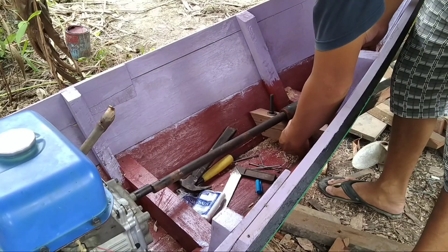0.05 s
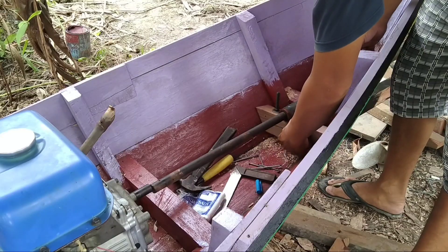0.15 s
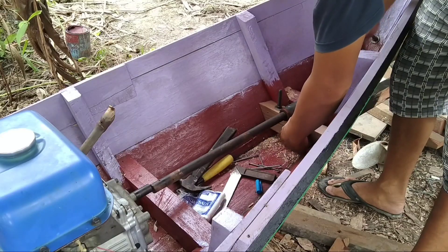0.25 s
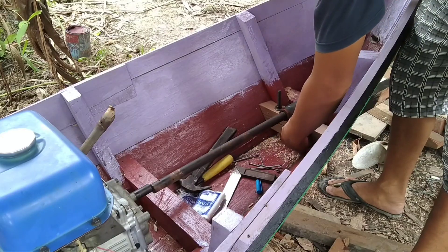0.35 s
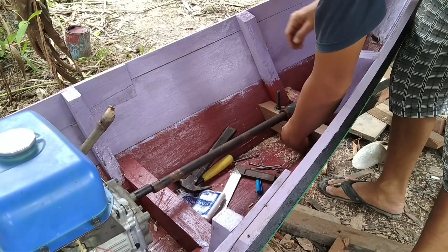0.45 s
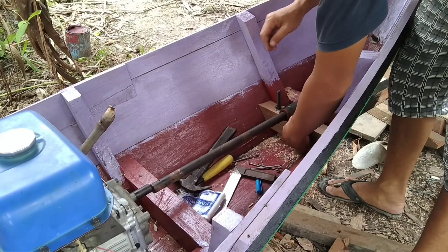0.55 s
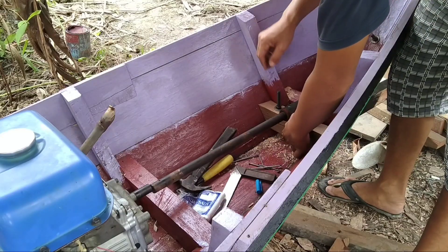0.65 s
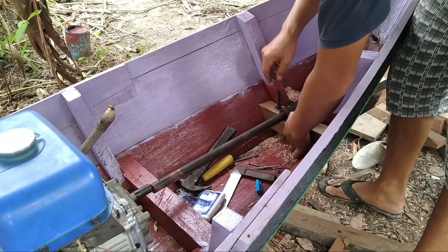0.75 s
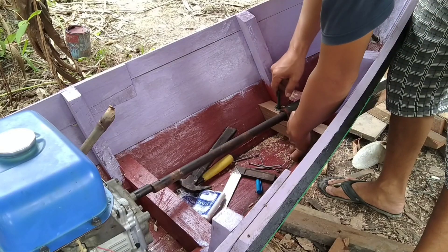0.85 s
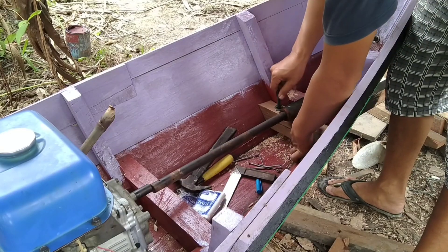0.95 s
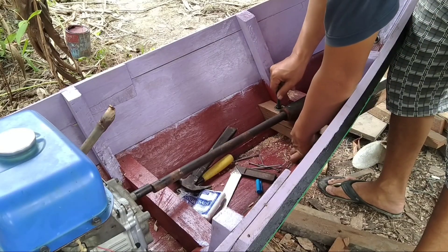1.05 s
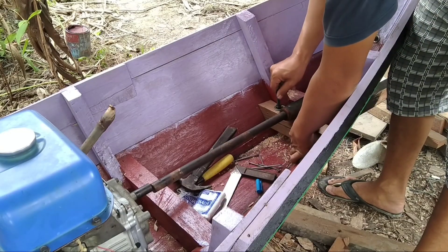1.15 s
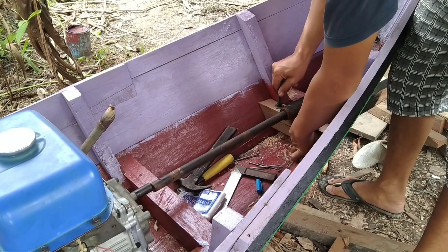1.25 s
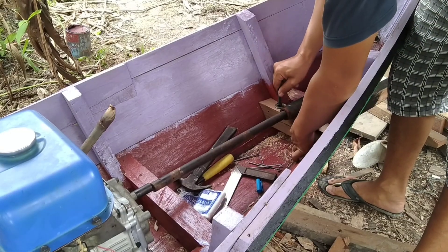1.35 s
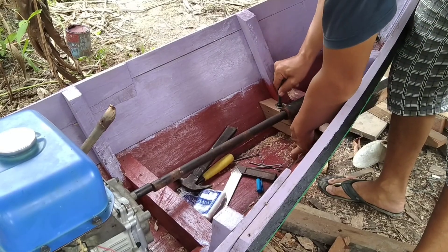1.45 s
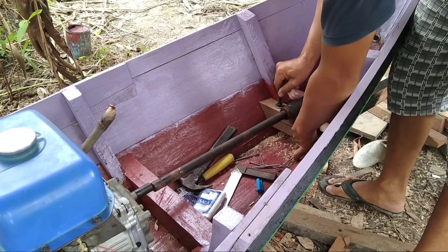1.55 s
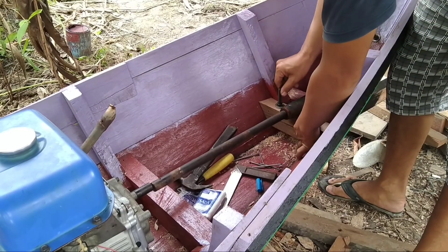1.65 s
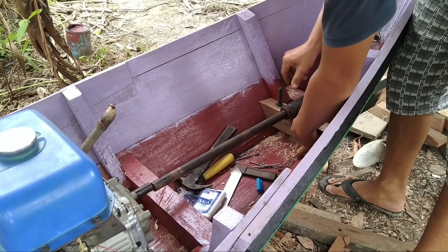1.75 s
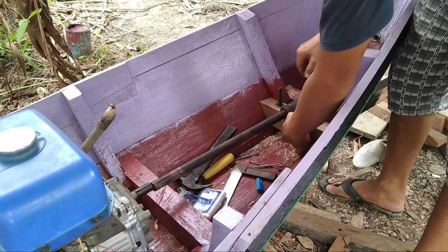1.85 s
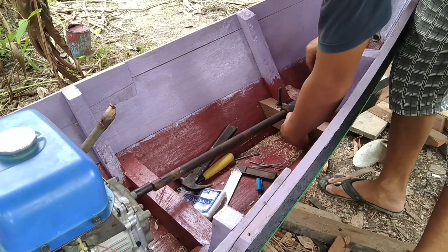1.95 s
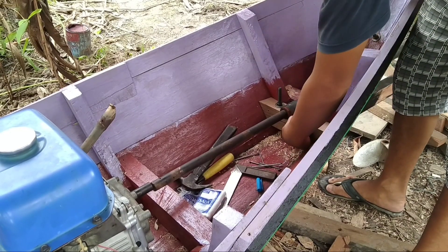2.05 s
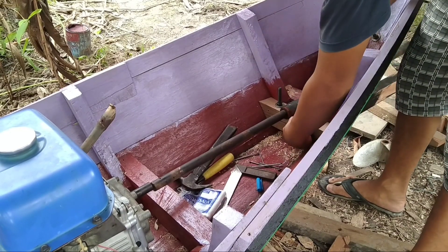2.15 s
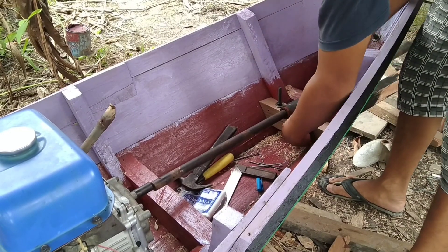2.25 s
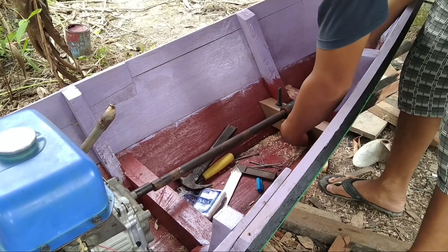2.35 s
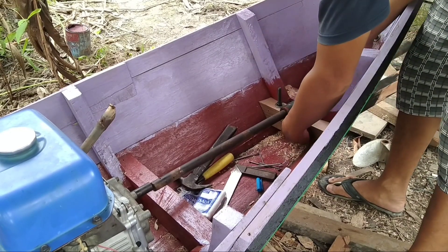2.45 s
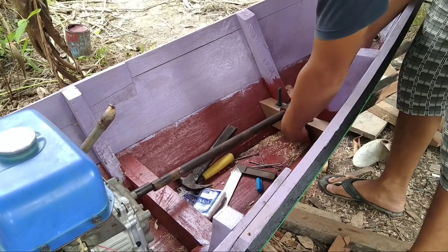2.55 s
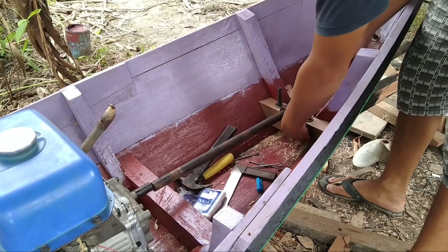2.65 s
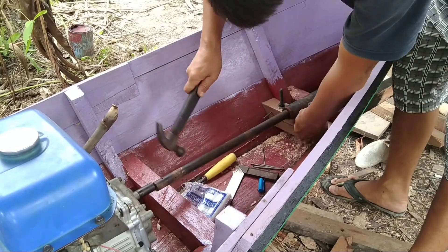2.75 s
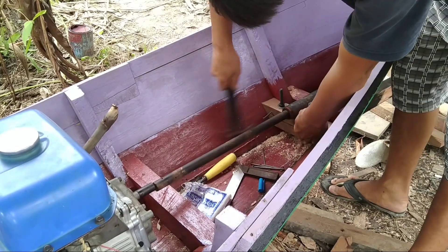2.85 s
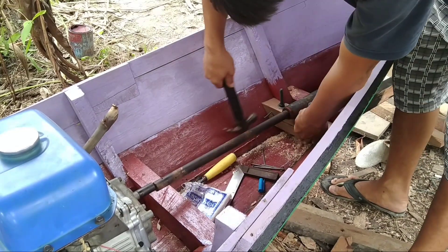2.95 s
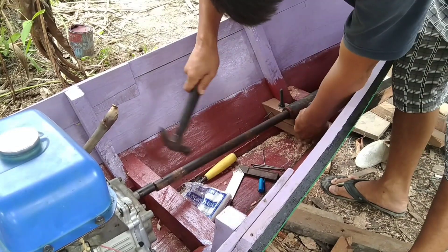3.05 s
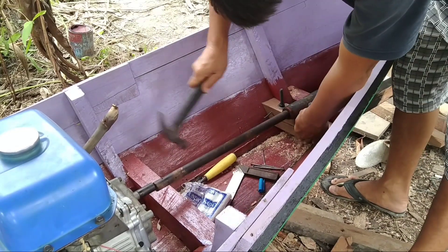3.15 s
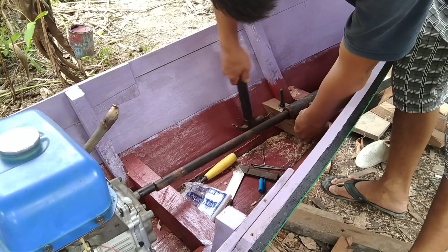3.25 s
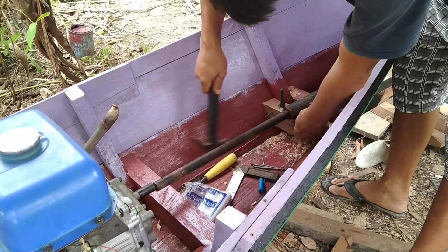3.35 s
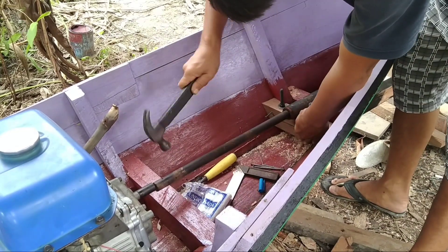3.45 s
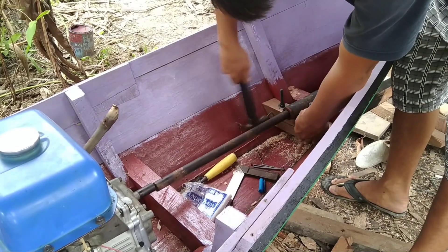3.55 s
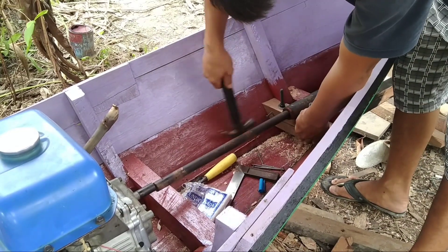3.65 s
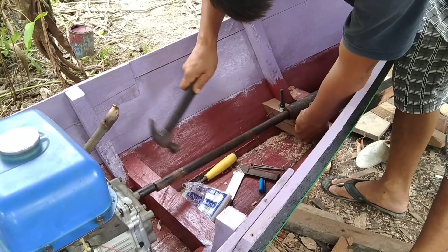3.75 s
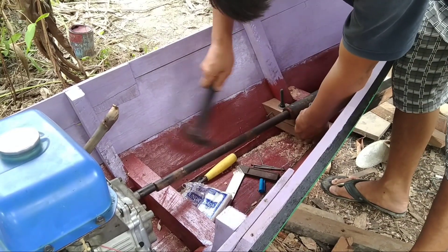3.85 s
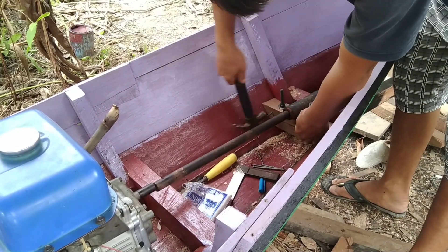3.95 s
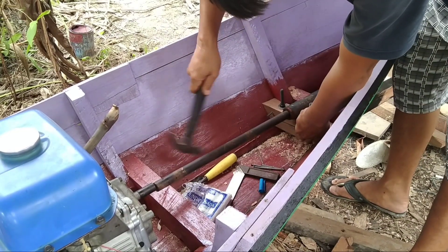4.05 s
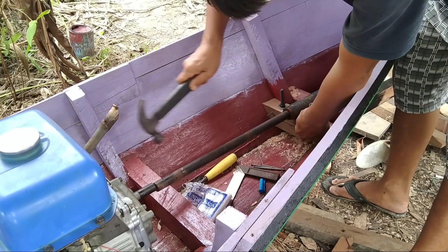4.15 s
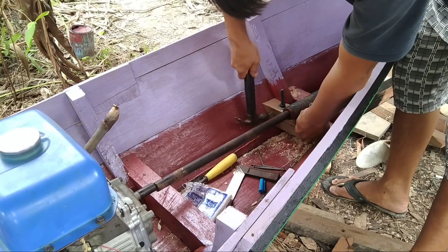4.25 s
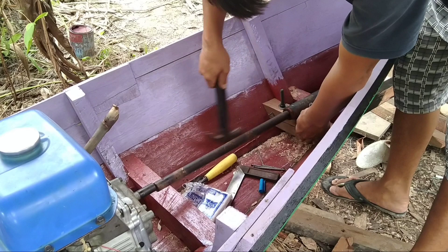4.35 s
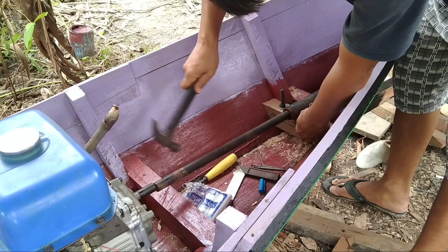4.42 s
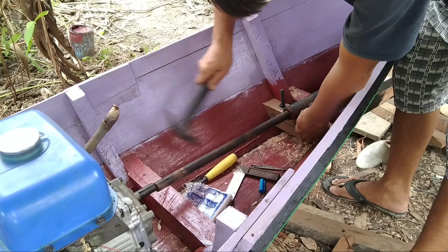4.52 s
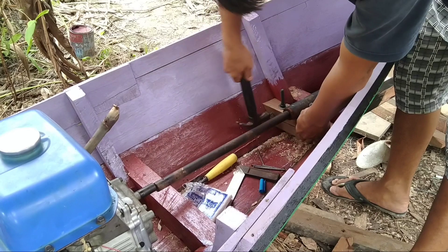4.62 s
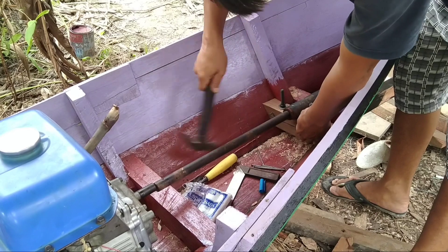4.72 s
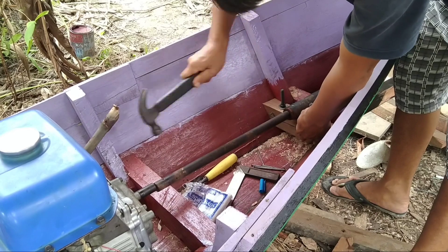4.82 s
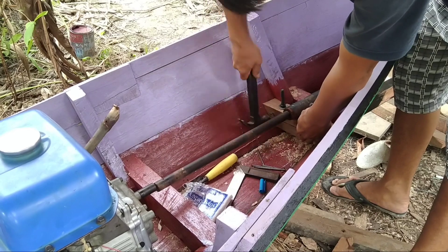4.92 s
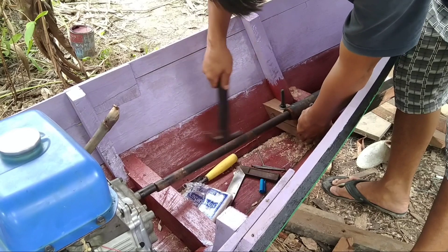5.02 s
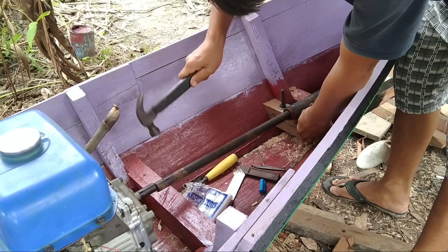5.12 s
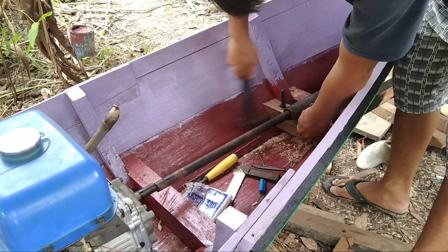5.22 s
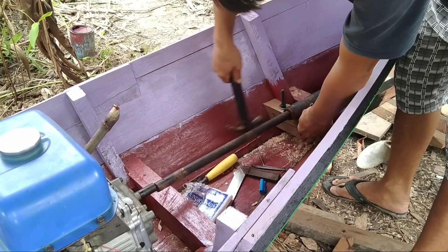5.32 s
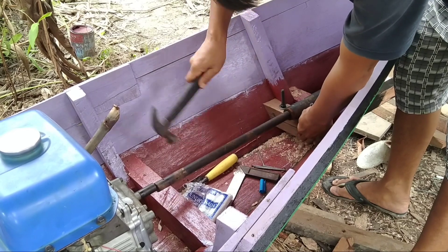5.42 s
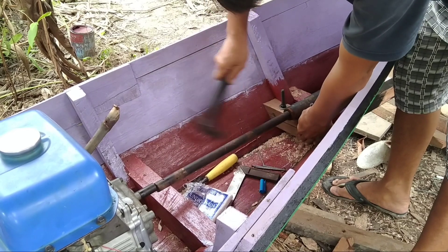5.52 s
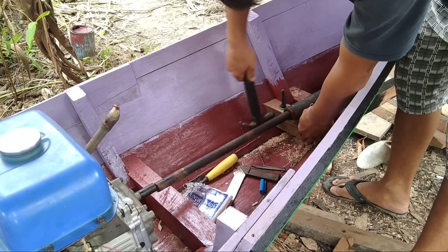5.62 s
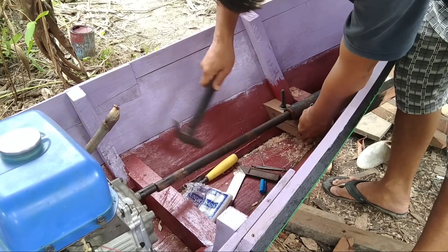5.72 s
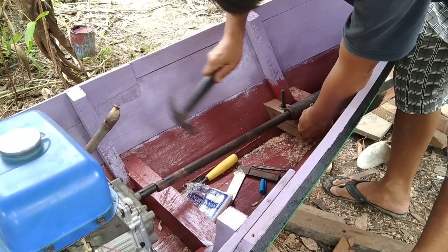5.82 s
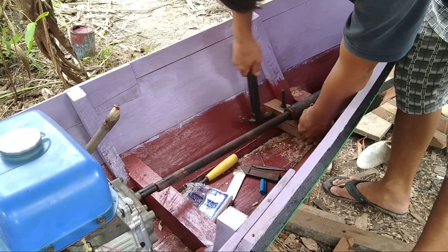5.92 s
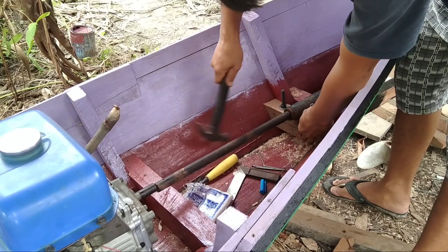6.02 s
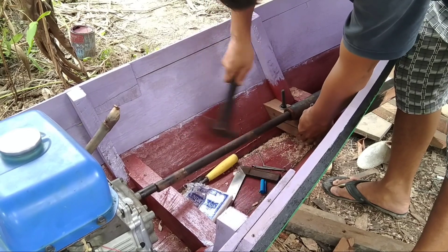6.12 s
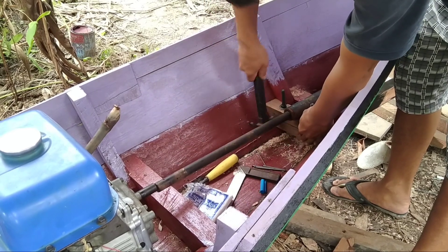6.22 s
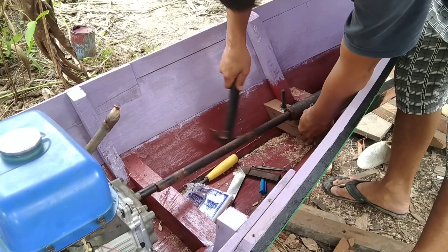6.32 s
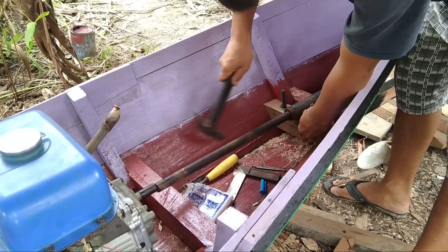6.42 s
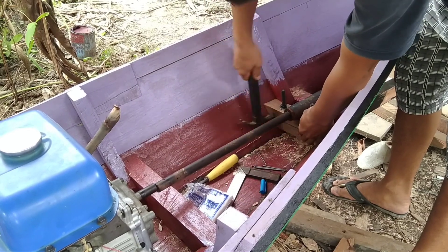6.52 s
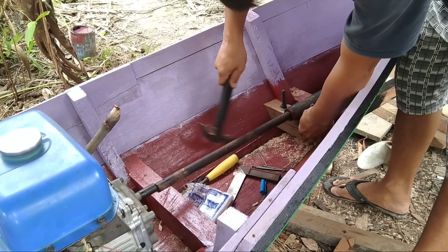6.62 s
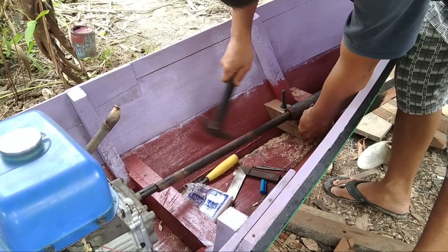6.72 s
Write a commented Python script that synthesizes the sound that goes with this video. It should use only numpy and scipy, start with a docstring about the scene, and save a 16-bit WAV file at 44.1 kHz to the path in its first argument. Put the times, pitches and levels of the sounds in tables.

```python
"""A wooden engine mount is hammered into a small plank boat outdoors, heard from close by.
First the block is nudged into place by hand, with soft double contacts and scratching grit, while birds
peep faintly. Then a claw hammer gives it twelve hard blows: decaying hull resonances and noise boom and crack,
the block jumps and lands again, steel pings as short sine tones, and the yard answers with scattered echo.
The birds are swept sine tones; under everything lies a quiet hush of wavering noise bands."""
import sys
import numpy as np
from scipy import signal
from scipy.fft import rfft, irfft
from scipy.io import wavfile

SR = 44100
rng = np.random.default_rng(int(sys.argv[2]) if len(sys.argv) > 2 else 0)


def log_audio(samples):
    """Write samples as a 16-bit WAV file to the path given in sys.argv[1]."""
    # one column per channel
    frames = np.atleast_2d(samples).T
    # limit to full scale, then quantise
    limited = np.clip(frames, -1, 1)
    pcm = np.round(limited * 32767).astype(np.int16)
    wavfile.write(sys.argv[1], SR, pcm)


N = 298998
RING_S = 0.4  # length of each contact sound
T = np.arange(int(RING_S * SR)) / SR


def undb(db):
    """Decibels to gain."""
    return 10 ** (np.asarray(db) / 20)


def fade(t60):
    """Free decay, 60 dB down after t60 seconds."""
    return np.exp(-np.log(1000) * T / max(t60, 1e-3))


def unit(x):
    """Scale to rms 1."""
    return x / np.sqrt(np.mean(x ** 2))


def add(track, s, sound):
    """Mix a sound in at s seconds, cutting it where the track ends."""
    i = int(round(s * SR))
    track[i:i + len(sound)] += sound[:len(track) - i]


def lowpass(x, hz, order=2):
    """Dull everything above hz."""
    return signal.sosfilt(signal.butter(order, min(hz, SR / 2 - 100), fs=SR, output="sos"), x)


def bandpass(x, hz, width_hz):
    """One resonance, gain 1 at its centre."""
    return signal.lfilter(*signal.iirpeak(hz, hz / width_hz, fs=SR), x)


def at_pitch(wanted_hz, table_hz, values):
    """Read a table column at any pitch, interpolating along log frequency."""
    return np.interp(np.log(wanted_hz), np.log(table_hz), values)


def noise_bands(size, count):
    """Centres and unit noises of adjoining bands across the audible range."""
    edges = np.geomspace(30, 17000, count + 1)
    hz = np.arange(size // 2 + 1) * SR / size
    spectrum = rfft(rng.standard_normal(size))
    bands = [unit(irfft(spectrum * (hz >= lo) * (hz < hi), size)) for lo, hi in zip(edges, edges[1:])]
    return np.sqrt(edges[1:] * edges[:-1]), np.array(bands)


def build_up(hz, rise_s):
    """Bending waves are slower at low pitch, so the lows swell later; rise_s holds at 1000 Hz."""
    return 1 - np.exp(-(T / (rise_s * (1000 / hz) ** 0.63)) ** 2)


# Hammer blows on the block. Each row: start in seconds, strength in dB, bottom thud in dB, crack in dB,
# delay of the rebound in seconds, rebound in dB; thud, crack and rebound are relative to the strength.
BLOWS = [(2.9503, -5.5, -4, 5, 0.032, -14), (3.2954, -4, -28, 4.5, .029, -2.5),
         (3.6386, -3.5, -20, 1.5, 0.028, -8), (3.9777, -1.5, -9, -1, .03, -6),
         (4.3179, -1.5, -15, -2.5, 0.036, -13.5), (4.6528, -1, -22, -1.5, .033, -11),
         (4.9902, -.5, -14, -1.5, .036, -8.5), (5.313, 0, -3.5, -1.5, 0.032, -10),
         (5.6393, -0.5, -11, -1, .027, -7.5), (5.9611, -.5, -10, 1.5, .035, -9),
         (6.273, -2.5, -13.5, 2, 0.026, -11.5), (6.556, -4, -3, 6, .037, -7.5)]
# Steel that pings when a blow lands off centre. Each row: start in seconds, pitch in Hz, level in dB.
PINGS = [(2.95, 8800, -32.5), (4.3194, 7160, -23), (5.6399, 7822, -26), (5.962, 8830, -35),
         (5.9614, 7760, -37)]
# The block sinks home: its knock ends higher and stronger, its crack deepens.
# Each row: time in seconds, knock in Hz, knock boost in dB, crack in Hz.
SINKING = [(3.3, 540, -0.5, 4300), (3.63, 510, 0, 3170), (5.64, 510, 1.5, 3080), (5.96, 647, 6.5, 2570),
           (6.55, 720, 11.5, 2370)]
KNOCK_WIDTH_HZ, CRACK_WIDTH_HZ = 256, 1320
CRACK_BOOST_DB, TICK_DB = 2.05, -0.8  # resonance and first tick of a blow whose crack is 0 dB
SIDE_DELAY_S, SIDE_DB, SIDE_DULL_HZ = 0.0105, -2, 1010  # reflection from the boat's side
ECHO_DB, ECHO_PER_CRACK = -32, 0.33  # the yard's answer; a sharper crack carries further (dB per dB)
PING_T60_S = 0.14


def hammering():
    """Each blow, its reflection from the boat's side and the block's rebound, then the yard's answer."""
    out = np.zeros(N)
    times, *tone = np.transpose(SINKING)
    for s, db, thud_db, crack_db, rebound_s, rebound_db in BLOWS:
        knock_hz, knock_db, crack_hz = (np.interp(s, times, column) for column in tone)
        hit = hull_modes(rise_s=0.0042) + hull_clatter()
        # how deep the block sits sets the knock; how squarely the face lands sets thud and crack
        hit = hit + (undb(knock_db) - 1) * bandpass(hit, knock_hz, KNOCK_WIDTH_HZ)
        hit = hit + (undb(crack_db + CRACK_BOOST_DB) - 1) * bandpass(hit, crack_hz, CRACK_WIDTH_HZ)
        blow = hit + planks() + undb(thud_db) * thud() + undb(crack_db + TICK_DB) * tick()

        reflection = lowpass(hull_clatter(crack_t60=0.0083, hold_s=0.0015), SIDE_DULL_HZ)
        add(blow, SIDE_DELAY_S, undb(SIDE_DB) * reflection)

        # the block jumps and lands again, with less treble
        landing = undb(-3.0) * hull_modes(rise_s=0.0011) + undb(3.5) * hull_clatter(hold_s=0.0064)
        add(blow, rebound_s, undb(rebound_db) * lowpass(landing, 1250, order=1))

        add(out, s, undb(db) * blow)
        echo_db = db + ECHO_DB + ECHO_PER_CRACK * crack_db
        add(out, s, undb(echo_db) * scatter(YARD_COLOUR))
    for s, hz, db in PINGS:
        add(out, s, undb(db) * np.sin(2 * np.pi * hz * T) * fade(PING_T60_S))
    return out


# Block and planks ring together. Each row: pitch in Hz, level in dB, 60 dB decay in seconds;
# every contact shifts pitch and level a little.
MODES = [(149.7, -33.5, 0.16), (248.5, -31, 0.2), (296.8, -26, 0.21), (323.5, -15, 0.096),
         (424.5, -18.5, 0.13), (474.8, -18.5, 0.09), (505, -10, 0.061), (559.8, -19, 0.12),
         (633, -13.5, 0.044), (698, -24, 0.1), (758.6, -28.5, 0.15), (834, -11.5, 0.042),
         (914, -23.5, 0.048), (1057, -24.5, 0.041), (1168.5, -11.5, 0.043), (1277.5, -16, 0.041),
         (1402, -30, 0.1), (1496, -30.5, 0.2), (1610, -28, 0.02), (1784, -16, 0.053), (1890, -25, 0.098),
         (2000, -27.5, 0.16), (2096, -59, 0.02), (2275, -7, 0.012), (2750, -47, 0.15), (2740, -17.5, 0.031),
         (3088, -10.5, 0.022), (3230, -29.5, 0.03), (4270, -7.5, 0.014), (4570, -55, 0.01)]


def hull_modes(detune=0.005, scatter_db=3.5, rise_s=0.003):
    """The strong resonances; each contact shares its energy among them a little differently."""
    out = 0
    chance = rng.standard_normal((len(MODES), 2))
    for k, ((hz, db, t60), (pitch_luck, level_luck)) in enumerate(zip(MODES, chance)):
        sign = (-1) ** k  # neighbouring modes start in opposite directions
        swing = sign * np.sin(2 * np.pi * hz * (1 + detune * pitch_luck) * T)
        out = out + undb(db + scatter_db * level_luck) * swing * fade(t60) * build_up(hz, rise_s)
    return out


# The hull's countless overlapping modes. Each row: pitch in Hz, crack in dB, ring in dB,
# 60 dB decay of the ring in seconds.
HULL_WOOD = [(40, -70, -86, .05), (114, -54, -48, 0.036), (201, -44.5, -38, 0.14), (510, -22.5, -27, 0.041),
             (990, -20, -29, 0.13), (2030, -25, -35, 0.11), (3220, -24.5, -37.5, 0.18),
             (5050, -21.5, -42.5, 0.14), (7530, -25.5, -32.5, 0.13), (8860, -40, -43.5, 0.17),
             (11770, -45.5, -56.5, 0.14), (16000, -48.5, -60.5, .15)]


def hull_clatter(crack_t60=0.027, rise_s=0.00086, hold_s=0.0087):
    """A sharp crack, then a dense ring that holds while the waves cross the hull; new noise at every contact."""
    centres, bands = noise_bands(len(T), count=44)
    hz, *columns = np.transpose(HULL_WOOD)
    crack_db, ring_db, ring_t60 = (at_pitch(centres, hz, column) for column in columns)
    snap = fade(crack_t60)
    late = np.maximum(T - hold_s, 0)
    out = 0
    for k, band in enumerate(bands):
        ring = undb(ring_db[k]) * np.exp(-np.log(1000) * late / ring_t60[k])
        out = out + band * (undb(crack_db[k]) * snap + ring) * build_up(centres[k], rise_s)
    return out


# Planks that go on singing faintly after a blow. Each row: pitch in Hz, level in dB, 60 dB decay in seconds
# before the closing taper; every blow shifts pitch and level a little.
PLANKS = [(97.7, -63, 4.1), (282, -34, 0.9), (536, -35.5, 0.36), (1380, -50.5, 0.69), (1410, -44, 0.18),
          (1770, -56.5, 1.07), (1950, -49, 1.1), (1970, -42, 0.34)]


def planks(detune=0.0033, scatter_db=2):
    """Lightly damped resonances that outlast the knock, tapered to silence at the end of the contact sound."""
    out = 0
    chance = rng.standard_normal((len(PLANKS), 3))
    for (hz, db, t60), (pitch_luck, level_luck, phase) in zip(PLANKS, chance):
        swing = np.sin(2 * np.pi * (hz * (1 + detune * pitch_luck) * T + phase))
        out = out + undb(db + scatter_db * level_luck) * swing * fade(t60) * build_up(hz, 0.0049)
    return out * (1 - (T / RING_S) ** 4)


def thud(hz=118, t60=0.03):
    """The bottom planks give way under the blow and swing back once or twice."""
    return np.sin(2 * np.pi * hz * T) * fade(t60) * build_up(hz, 0.00092)


def tick(hz=4300, t60=0.0012):
    """The first instant of steel meeting wood."""
    return lowpass(np.sin(2 * np.pi * hz * T) * fade(t60), 7450, order=4)


# The block is nudged, touches with one edge and drops flat.
# Each row: start in seconds, touch in dB, drop in dB.
NUDGES = [(.209, -49, -29), (.25, -42, -32), (.333, -24.5, -31), (1.25, -33.5, -19), (1.351, -31.5, -22.5),
          (2.032, -56, -41)]
# Grit scraping under the block. Each row: start in seconds, level in dB, centre in Hz.
SCRAPES = [(.097, -55, 1600), (.243, -56.5, 1940), (.269, -60, 1880), (.276, -63, 5500), (.387, -63, 3400),
           (1.514, -59, 3130), (2.019, -59, 1650), (2.751, -66, 4000), (5.915, -54.5, 3640)]
TOUCH_HZ, DROP_HZ, DROP_AFTER_S = 740, 352, 0.016  # each contact is dull above its pitch
SCRAPE_CYCLES = 39  # a scrape peaks after half this many cycles, so fine grit is over sooner


def seating():
    """Soft contacts reach mainly the low modes; grit scratches as narrow noise that swells and fades."""
    out = np.zeros(N)
    for s, touch_db, drop_db in NUDGES:
        for at, db, dull_hz in (s, touch_db, TOUCH_HZ), (s + DROP_AFTER_S, drop_db, DROP_HZ):
            contact = hull_modes(rise_s=0.00044) + undb(1.0) * hull_clatter()
            add(out, at, undb(db) * lowpass(contact, dull_hz, order=3))
    for s, db, hz in SCRAPES:
        width_hz = 0.54 * hz
        grit = bandpass(bandpass(rng.standard_normal(len(T)), hz, width_hz), hz, width_hz)
        grit = unit(lowpass(grit, 8500, order=6))
        age = 2 * T * hz / SCRAPE_CYCLES
        add(out, s, undb(db) * grit * age * np.exp(1 - age))
    return out


# A bird's falling peeps. Each row: start in seconds, length in seconds, starting pitch in Hz, level in dB.
PEEPS = [(0.125, 0.26, 3260, -63), (.66, 0.15, 3040, -62.5), (.9, 0.21, 3160, -63),
         (1.212, 0.26, 3300, -60.5), (1.52, 0.12, 2930, -65), (1.762, 0.12, 2900, -63),
         (1.961, 0.14, 2750, -61.5), (2.182, 0.18, 3000, -64), (2.491, 0.16, 3290, -59),
         (4.24, 0.094, 3030, -61), (4.897, .12, 2950, -63)]
# a more distant bird pips on a lower note, once at a random moment of each time slot
PIPS_PER_S, PIP_HZ, PIP_SPREAD_OCT, PIP_S, PIP_DB = 2.3, 1430, 0.191, 0.072, -62.5
DROOP_OCT_PER_S = 2.3


def birds():
    """One bird peeps over and over; another pips lower and further off."""
    out = np.zeros(N)
    for s, length, start_hz, db in PEEPS:
        add(out, s, undb(db) * whistle(length, start_hz))
    for k, (when, pitch) in enumerate(rng.random(size=(30, 2))):
        pip = whistle(PIP_S, PIP_HZ * 2 ** (PIP_SPREAD_OCT * (2 * pitch - 1)))
        s = (k + when) / PIPS_PER_S
        if s < N / SR:
            add(out, s, undb(PIP_DB) * pip)
    return out


def whistle(length, start_hz, waver=0.0337, waver_hz=154):
    """A thin, wavering note that swells, fades and droops at a steady rate."""
    wavering = 1 + waver * unit(lowpass(rng.standard_normal(len(T)), waver_hz))
    hz = start_hz * 2 ** (-DROOP_OCT_PER_S * T) * wavering
    swell = np.sin(np.pi * np.minimum(T / length, 1))
    return swell * np.sin(2 * np.pi * np.cumsum(hz) / SR)


# Colour of the yard's answer to a blow. Each row: pitch in Hz, relative level in dB.
YARD_COLOUR = [(59, -55), (100, -25), (210, -15), (283, 1.5), (406, -2), (535, 3.5), (648, -17.5),
               (872, -12), (1230, -17.5), (1390, -8.5), (1910, -15.5), (2420, -19), (5420, -27.5),
               (7290, -23.5), (16000, -103)]
# the yard's echo swells, sags while the near walls answer, then dies away
YARD_ATTACK_S, YARD_HOLD_S, YARD_SAG_DB_PER_S, YARD_RELEASE_DB_PER_S = 0.027, 0.13, 39, 130


def scatter(colour, uneven_db=4):
    """Countless small echoes from the ground, plants and walls around the boat, with a (Hz, dB) colour."""
    size = SR * 3 // 4
    t = np.arange(size) / SR
    echoes = rng.standard_normal(size) * undb(uneven_db * rng.standard_normal(size))
    hz, db = np.transpose(colour)
    bins_hz = 1 + np.arange(size // 2 + 1) * SR / size  # 1 Hz up, to keep the logarithm finite
    coloured = unit(irfft(rfft(echoes) * undb(at_pitch(bins_hz, hz, db)), size))
    sag_db = YARD_SAG_DB_PER_S * np.minimum(t, YARD_HOLD_S)
    release_db = YARD_RELEASE_DB_PER_S * np.maximum(t - YARD_HOLD_S, 0)
    return coloured * np.minimum(t / YARD_ATTACK_S, 1) * undb(-sag_db - release_db)


def yard(x, db):
    """The yard returns a sound with its pitches kept, the highs softened."""
    echo = scatter([(300, -4.0), (800, 9.5), (3000, -1.5), (12000, -6.0)])
    echo = echo / np.sqrt(np.sum(echo ** 2))
    return undb(db) * signal.fftconvolve(x, echo)[:N]


# Colour of the outdoor hush. Each row: pitch in Hz, relative density in dB per Hz.
AIR_COLOUR = [(18, -68), (30, -48), (56, -9.5), (114, -1), (239, -7), (326, -2), (526, -4), (579, -6.5),
              (1430, -10), (2150, -16), (2860, -16.5), (3630, -20.5), (6440, -29), (7620, -19), (9000, -43),
              (11700, -77), (19800, -120)]
AIR_DB = -60  # rms of the hush before its top is cut


def air(flicker_db=3.0, hiss_db=-72, edge_hz=8000):
    """Quiet outdoor hush that wavers a little, with a narrow high hiss on top."""
    centres, bands = noise_bands(N, count=40)
    hz, db = np.transpose(AIR_COLOUR)
    levels = at_pitch(centres, hz, db) + 10 * np.log10(centres)  # wider bands hold more power
    hush = 0
    for band, band_db in zip(bands, levels):
        steps = rng.standard_normal(size=50)
        flicker = np.interp(np.linspace(0, len(steps) - 1, N), np.arange(len(steps)), steps)
        hush = hush + band * undb(band_db + flicker_db * flicker)
    hiss = unit(bandpass(bandpass(rng.standard_normal(N), 7620, 970), 7620, 970))
    return lowpass(undb(AIR_DB) * unit(hush) + undb(hiss_db) * hiss, edge_hz, order=16)


def scene():
    """Boat close by; the birds are further off and heard partly by their echo."""
    blows, small, peeps = hammering(), seating(), birds()
    echoes = yard(blows, db=-26.5) + yard(small, db=-21.5) + yard(peeps, db=-12.5)
    return (blows + small + peeps + echoes + air())[None]


def record(dry, low_hz=42, top_hz=15700):
    """The microphone drops the deepest bass; the recorder rounds the hardest peaks and cuts the top."""
    no_rumble = signal.sosfilt(signal.butter(2, low_hz, "high", fs=SR, output="sos"), dry)
    rounded = np.tanh(no_rumble)
    return signal.sosfilt(signal.ellip(8, 0.2, 70, top_hz, fs=SR, output="sos"), rounded)


dry = scene()
out = record(dry)
log_audio(out)
```